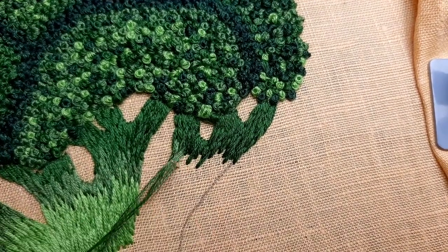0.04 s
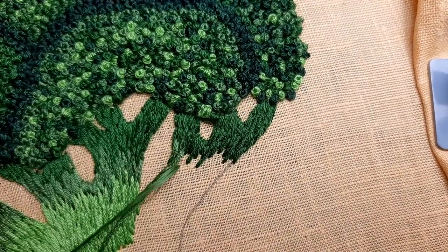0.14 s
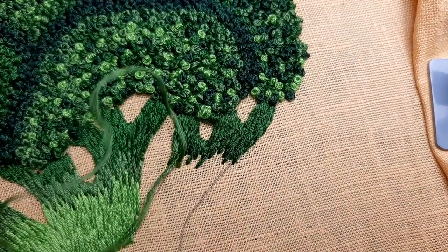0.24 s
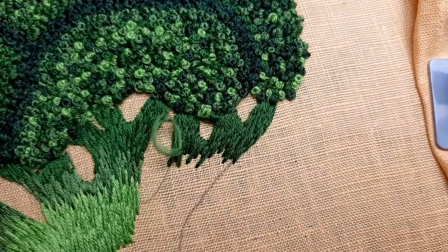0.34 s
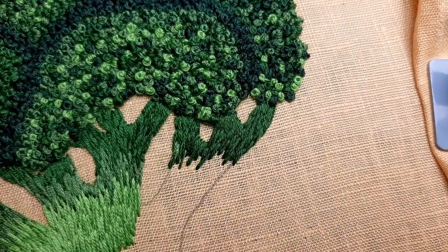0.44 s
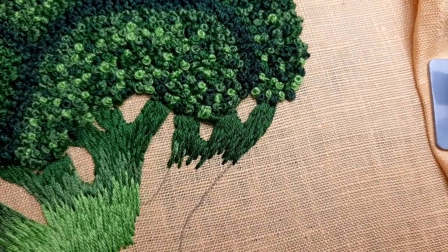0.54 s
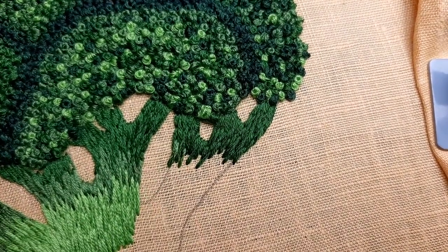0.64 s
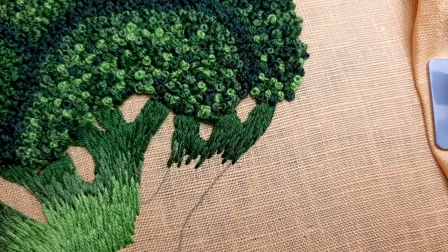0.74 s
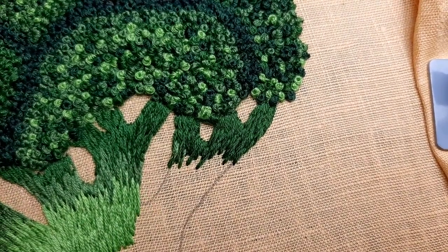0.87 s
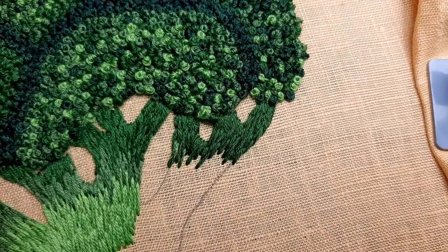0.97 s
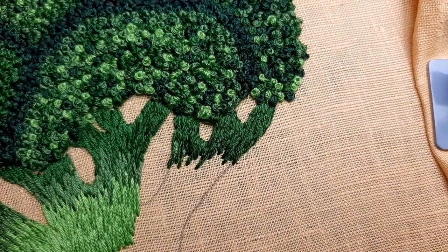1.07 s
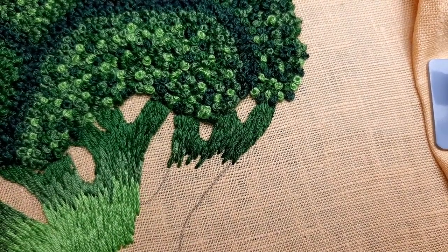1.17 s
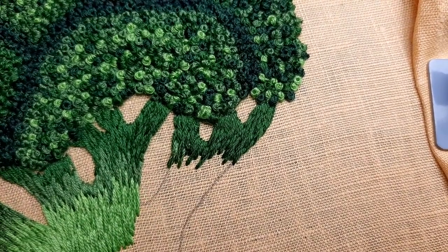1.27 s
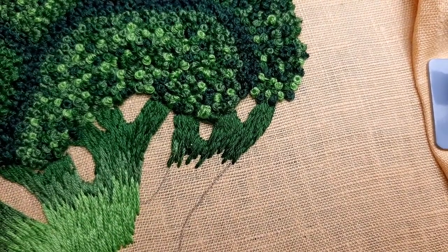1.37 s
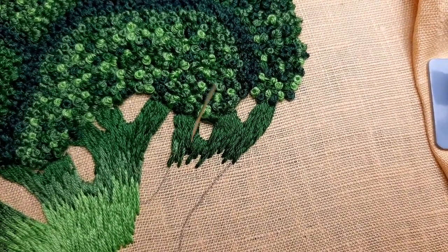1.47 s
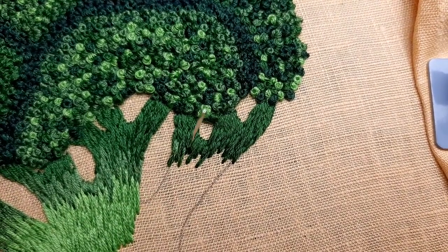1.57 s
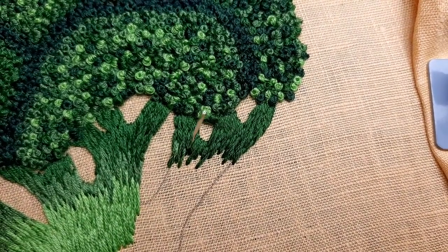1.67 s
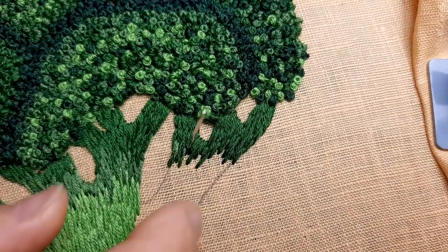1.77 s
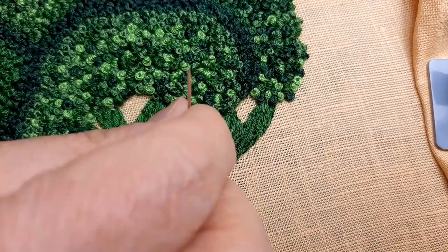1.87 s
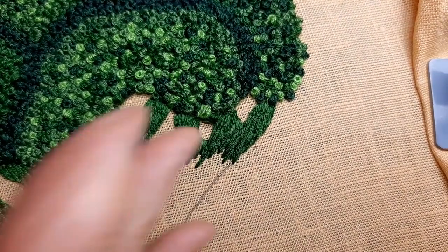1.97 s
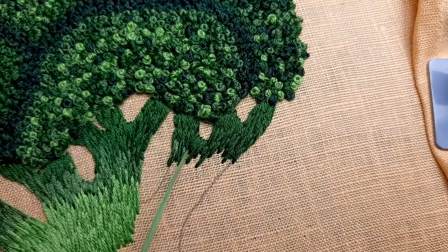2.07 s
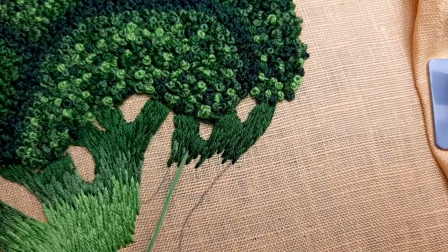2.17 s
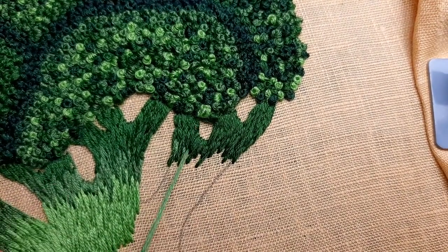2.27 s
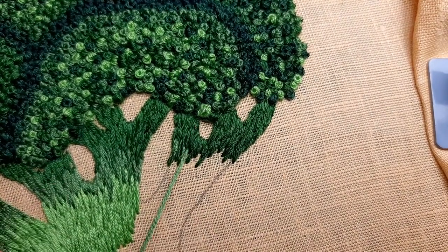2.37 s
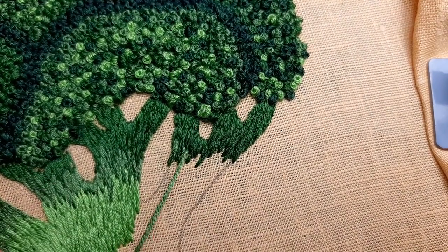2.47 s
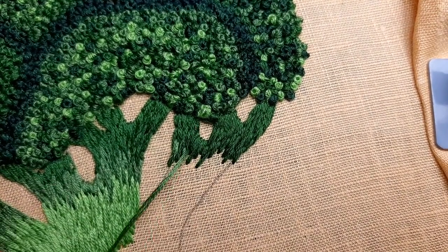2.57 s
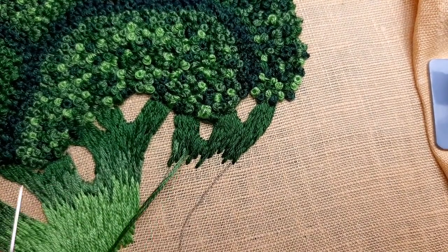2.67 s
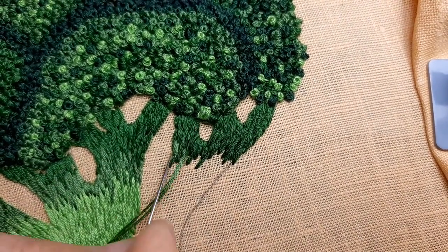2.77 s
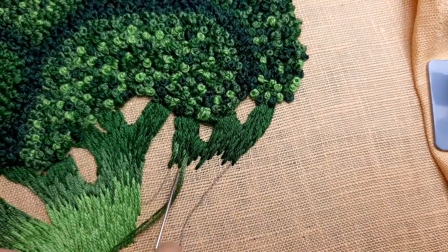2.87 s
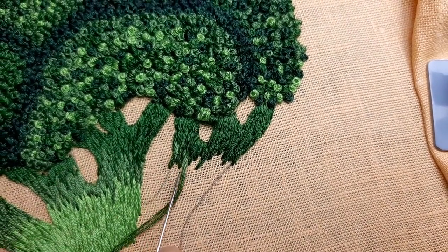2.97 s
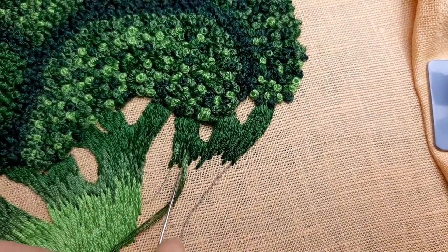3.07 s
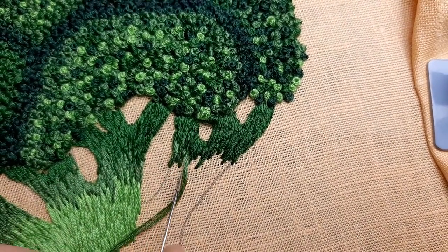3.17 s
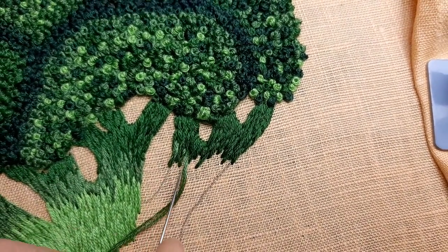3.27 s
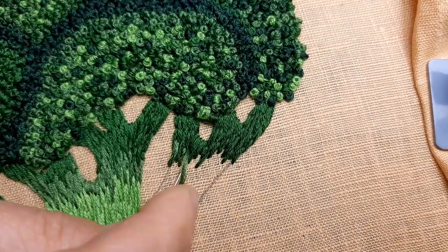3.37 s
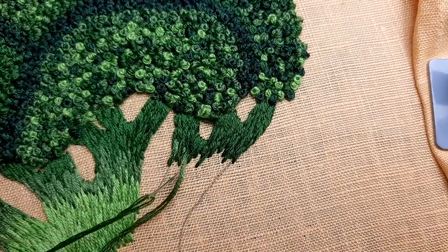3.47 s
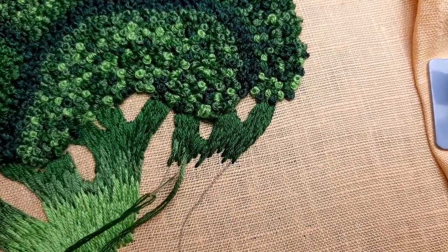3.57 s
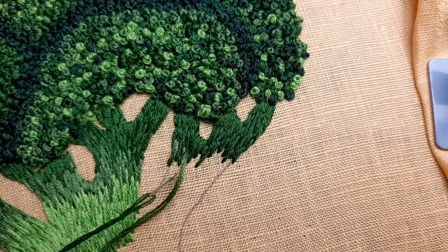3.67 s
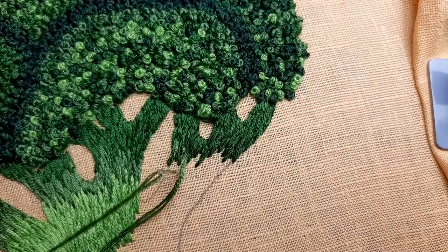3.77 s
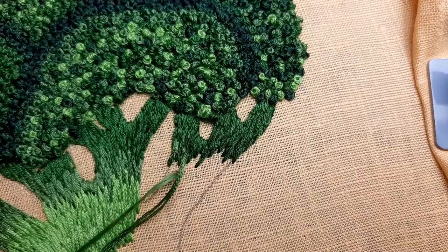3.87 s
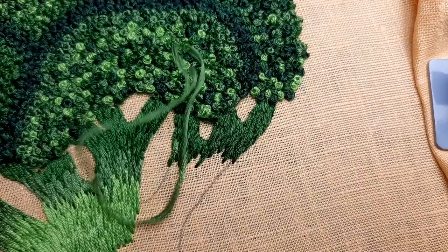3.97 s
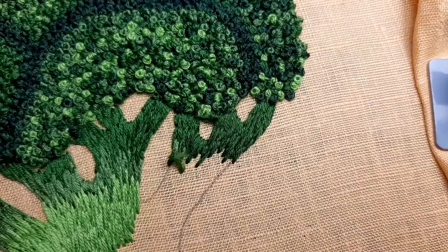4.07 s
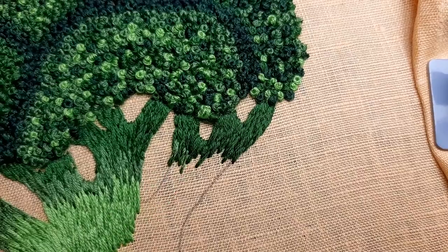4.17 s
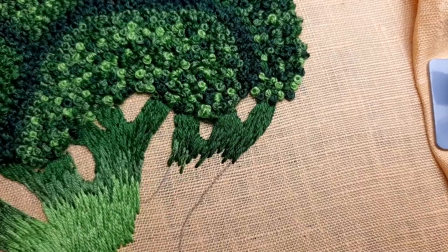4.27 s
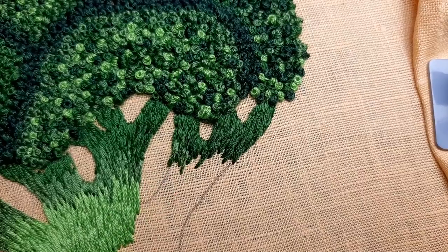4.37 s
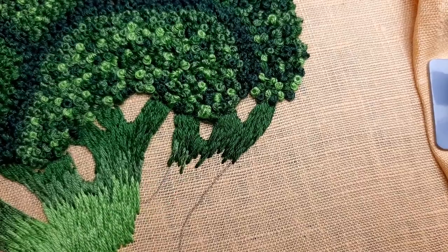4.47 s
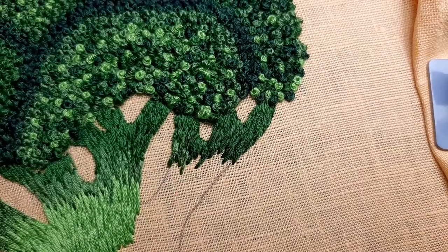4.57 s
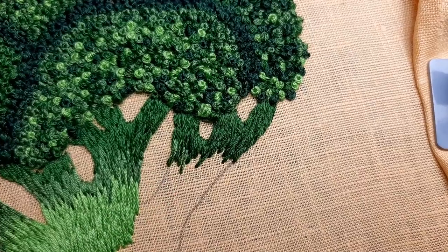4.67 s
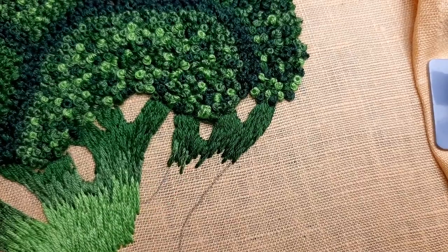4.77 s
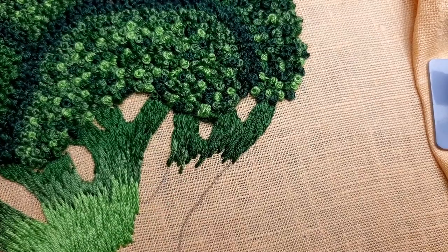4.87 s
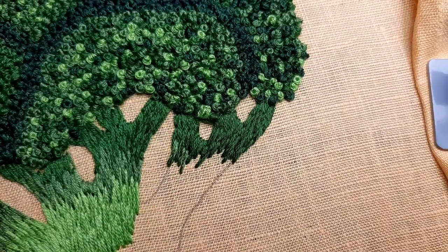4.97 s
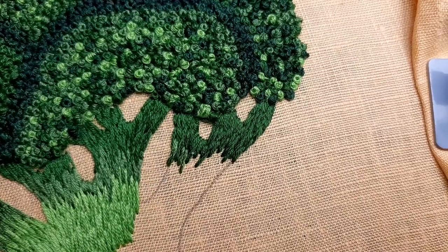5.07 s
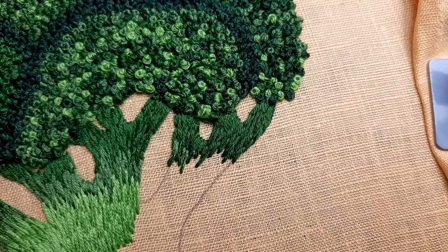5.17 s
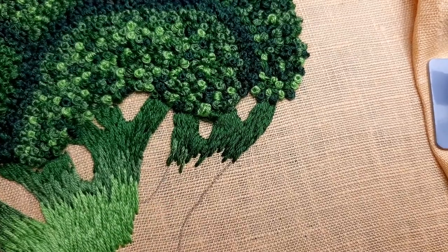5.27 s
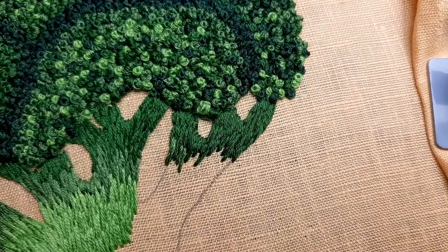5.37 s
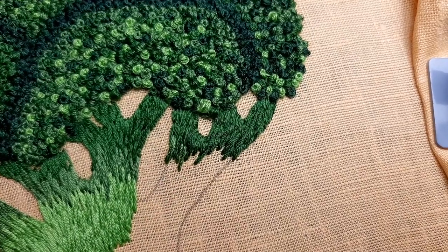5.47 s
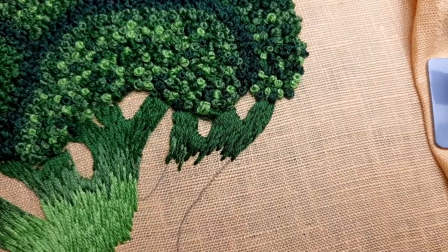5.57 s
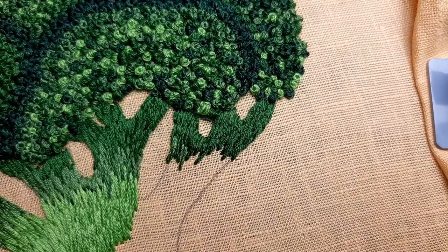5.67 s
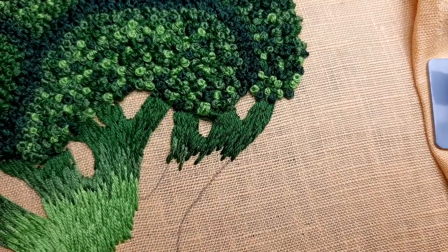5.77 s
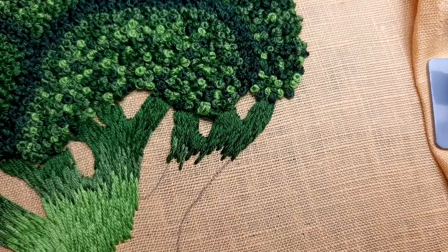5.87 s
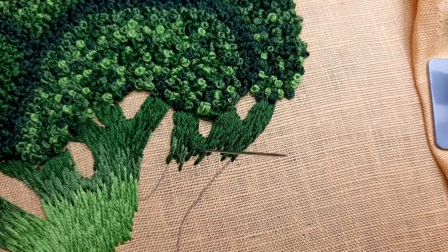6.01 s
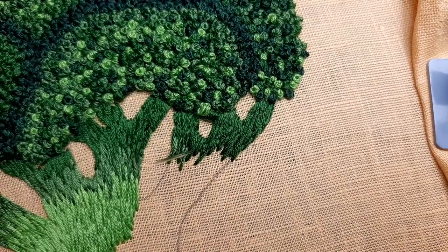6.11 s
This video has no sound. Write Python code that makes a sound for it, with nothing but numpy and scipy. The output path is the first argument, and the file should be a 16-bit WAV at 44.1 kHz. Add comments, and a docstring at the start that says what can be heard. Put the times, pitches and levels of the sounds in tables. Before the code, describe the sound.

Hollow little fabric thumps, each followed by a quick scratchy thread pull, in a quiet room with a small engine revving faintly beyond the wall.

```python
"""Embroidery on linen stretched drum-tight in a hoop, just right of a pair of microphones in a quiet room.
From the start the needle pops through the cloth, ringing its modes, and yarn rasps after it as dense slips
and fibre hiss; fingers brush and tap between three pulls, the second trailing on slowly. A faint hum passes early.
After two seconds a small engine, a sum of firing orders, slows beyond the wall, revs up and changes gear as two
more hums pass, then fades. Low street rumble, noise through wall resonances, and still air last throughout."""
import sys
import numpy as np
from scipy import signal
from scipy.fft import rfft, irfft, next_fast_len
from scipy.io import wavfile
from scipy.ndimage import uniform_filter1d

SR = 44100
rng = np.random.default_rng(int(sys.argv[2]) if len(sys.argv) > 2 else 0)


def store_pcm(level_fs):
    """Save levels as 16-bit WAV."""
    pcm = np.round(np.clip(level_fs, -1, 1) * 32767).astype(np.int16)
    wavfile.write(sys.argv[1], SR, np.atleast_2d(pcm).T)


def gain_from_db(level_db):
    """Convert decibel levels to linear amplitude factors (20 dB per decade)."""
    decades = np.asarray(level_db, float) / 20
    return 10 ** decades


N = 270758  # samples


def evened(x):
    """Normalization: scales a signal to rms 1."""
    return x / np.sqrt(np.mean(x ** 2) + 1e-20)


def read(points, hz):
    """Interpolation on a logarithmic frequency axis."""
    f, value = np.transpose(points)
    return np.interp(np.log(hz + 1), np.log(f + 1), value)


def stroke(start, length):
    """Event time base: sample range, seconds since the start and share done."""
    at = np.arange(round(start * SR), min(round((start + length) * SR), N))
    t = (at - at[0]) / SR
    return at, t, t / length


def swells(rows):
    """Amplitude envelope: flat-topped swells, each length lying between its 1/e points."""
    t = np.arange(0, N / SR, .002)
    gain = sum(gain_from_db(db) * np.exp(-(2 * (t - s) / length) ** 4) for s, db, length in rows)
    return np.interp(np.arange(N) / SR, t, gain)


def wander(size, seconds):
    """Low-pass noise: slow chance of rms 1."""
    wide = max(1, round(seconds * SR))
    smooth = uniform_filter1d(rng.standard_normal(size), wide)
    return evened(uniform_filter1d(smooth, wide))


def coloured(x, points):
    """Spectral shaping: filters by a spectrum in relative dB per Hz; rms 1."""
    size = next_fast_len(N)
    shape = gain_from_db(read(points, np.fft.rfftfreq(size, 1 / SR)))
    return evened(irfft(rfft(x, size) * shape, size)[:N])


def grit(per_s, spread_db):
    """Stick-slip as shot noise: random clicks of both signs, a few of them large; rms 1."""
    size = gain_from_db(spread_db * np.minimum(rng.exponential(1, N), 4)) * rng.standard_normal(N)
    return evened(size * (rng.random(N) < per_s / SR))


def pair(x, other, left_db, lag, same):
    """Interaural-style level, delay (samples) and coherence; rms-1 inputs give a summed power of 4."""
    same = np.clip(same, 0, 1)
    left = same * np.roll(x, round(lag)) + np.sqrt(1 - same ** 2) * other
    both = np.array([gain_from_db(left_db) * left, x])
    return 2 * both / (1 + gain_from_db(2 * left_db)) ** .5


# modes of the stretched cloth and hoop:
# (frequency [Hz], relative level [dB], t60 at damping 1 [s], left minus right [dB])
CLOTH_MODES = [(88.9, -11, 0.29, -21.5), (170, -3.5, 0.28, -25), (220.4, 9, 0.088, -28.5),
               (269.7, 10.5, 0.051, -6.5), (324, -1.5, 0.13, -6.5), (434.5, -4.5, 0.12, -3.5),
               (420, -22.5, 0.02, -7), (676, -7, 0.056, -11.5), (771, -18.5, 0.022, 7),
               (900, -18.5, 0.055, -17), (1027, -21, 0.063, -2.5), (1142, -19.5, 0.013, -11),
               (1447, -15.5, 0.03, -2.5), (1543, -21, 0.03, -2.5), (2116, -9, 0.01, -3.5)]


def drum_modes(damping=1, phase=0.98):
    """Modal decay: each mode of the cloth rings out as an exponentially damped cosine."""
    hz, _, t60, _ = np.transpose(CLOTH_MODES)[:, :, None]
    t = np.arange(SR // 3) / SR
    return gain_from_db(-60 * damping * t / t60) * np.cos(2 * np.pi * hz * t + phase)


def drum_response(modes, tilt_db=0, bell_db=0):
    """Modal superposition at both microphones; tilt and bell weight modes by octaves from 1100 Hz."""
    hz, db, _, left_db = np.transpose(CLOTH_MODES)
    octaves = np.log2(hz / 1100)
    gain = gain_from_db(db + tilt_db * octaves - bell_db * octaves ** 2)
    left = (gain * gain_from_db(left_db)) @ modes
    left = np.pad(left, (5, 0))[:modes.shape[1]]  # 5 samples later than the right
    return np.array([left, gain @ modes]) / gain.sum()


# needle pops and finger taps: (time [s], relative blow level [dB], relative tick level [dB],
# contact [ms], brightness [dB per octave], higher near the rim)
POPS_AND_TAPS = [(0.1203, -15.5, -54, 0.97, 6.5), (0.1277, -9.5, -47, 0.38, -1),
                 (0.897, -34.5, -62.5, 3.3, -7.5), (0.969, -37.5, -61, 0.38, 3),
                 (1.036, -26.5, -69, 1.06, 10.5), (1.046, -30.5, -59, 0.55, 4),
                 (1.789, -34, -69.5, 1.23, -1.5), (1.925, -11, -57, 1.12, 10),
                 (1.9324, -6, -58, 0.61, -4.5), (2.8599, -20, -42, 0.13, 7), (3.017, -26.5, -67, 1.18, 0),
                 (3.264, -27.5, -64, 0.84, 4), (3.744, -21.5, -55.5, 1.55, -5),
                 (3.8542, -9.5, -48, 0.69, 6), (3.8582, -8.5, -40, 0.58, 2), (4.8076, -28, -58, 0.69, 4.5),
                 (4.894, -26.5, -58.5, 0.53, 4), (4.972, -33, -72, 0.8, -7),
                 (5.0409, -6.5, -27.5, 0.45, 1.2), (5.541, -21, -56, 1.06, 5.5),
                 (6.025, -31, -58, 1.5, -2.5)]
TICK_T60_S, SNAP_DB = 0.0023, 12  # one sharp snap
FRAY_T60_S, FRAY_DB = 0.12, -23.5  # then fibres crackle on


def blows():
    """Impulse excitation: a short smooth push rings the cloth; a tick of noise marks the steel needle."""
    out, modes = np.zeros((2, N + SR)), drum_modes()
    t = np.arange(SR // 10) / SR
    noise = rng.standard_normal((len(POPS_AND_TAPS), len(t)))
    noise[:, 0] = gain_from_db(SNAP_DB)
    dying = gain_from_db(-60 * t / TICK_T60_S) + gain_from_db(FRAY_DB - 60 * t / FRAY_T60_S)
    for (s, blow_db, tick_db, contact_ms, rim_db), puff in zip(POPS_AND_TAPS, noise):
        push = np.hanning(max(3, round(contact_ms * SR / 1000)) + 2)
        push = push[None] / push.sum()
        sound = gain_from_db(blow_db) * signal.fftconvolve(drum_response(modes, rim_db), push, axes=1)
        tick = gain_from_db(tick_db) * dying * signal.lfilter([1, .2], 1, puff)
        sound[:, :len(t)] += [gain_from_db(-9) * np.roll(tick, 6), tick]
        sound[0] *= gain_from_db(-3.5)  # the hole is on the right of the hoop
        at = round(s * SR)
        out[:, at:at + sound.shape[1]] += sound
    return out[:, :N]


# pulls of yarn: (start [s], length [s], relative rasp through the cloth [dB], relative fibre hiss [dB],
# share done at top speed [0 to 1], rasp lost by the end [dB])
YARN_PULLS = [(.13, 0.29, -51, -58, 0.35, 11.5), (1.935, 0.29, -48, -60.5, 0.48, 18),
              (3.862, 0.25, -49, -56, 0.29, 6)]
ONSET_S, STOP_S = 0.0063, 0.016
JERK_DB, JERK_S = 9, 0.038  # the yarn breaks loose with a jerk
RASP_START_DB = 2.5  # drop at the start
HISS_START_DB, HISS_END_DB = 6, 9  # hiss starts low and dies faster than the rasp
JUDDER_DB, JUDDER_S = 1.13, 0.01  # the hand does not pull evenly
TRAIL_START_S, TRAIL_LENGTH_S = 2.175, .2  # the second pull trails on slowly
TRAIL_RASP_DB, TRAIL_HISS_DB = -69, -74.5


def pulls():
    """Speed-dependent friction: gains of rasp and of hiss as the hand speeds up, then slows."""
    rasp, fibres = np.zeros((2, len(YARN_PULLS), N))
    judder = gain_from_db(JUDDER_DB * wander(N, JUDDER_S))
    for k, (start, length, rasp_db, hiss_db, top, end_db) in enumerate(YARN_PULLS):
        at, t, done = stroke(start, length)
        ends = np.clip(np.minimum(t / ONSET_S, (length - t) / STOP_S), 0, 1)
        early = np.maximum(1 - done / top, 0) ** 2
        late = np.maximum((done - top) / (1 - top), 0) ** 2
        jerk_db = JERK_DB * np.exp(-t / JERK_S)
        rasp[k, at] = ends * gain_from_db(rasp_db + jerk_db - RASP_START_DB * early - end_db * late)
        fibres[k, at] = ends * gain_from_db(hiss_db - HISS_START_DB * early - (end_db + HISS_END_DB) * late)
    at, t, _ = stroke(TRAIL_START_S, TRAIL_LENGTH_S)
    ends = np.clip(np.minimum(t, TRAIL_LENGTH_S - t) / STOP_S, 0, 1)
    rasp[1, at] += ends * gain_from_db(TRAIL_RASP_DB)
    fibres[1, at] += ends * gain_from_db(TRAIL_HISS_DB)
    return rasp.sum(0) * judder, fibres * judder


def shaken(force, ring):
    """Convolution: the cloth under a random force; the mean of both microphones has rms 1."""
    sound = signal.oaconvolve(force[None], ring, axes=1)[:, :N]
    return sound / sound.mean(0).std()


# short scrapes of a yarn end or needle tip on the weave:
# (time [s], relative level [dB], fall to 1/e [s])
WEAVE_SCRAPES = [(0.465, -56, 0.034), (1.678, -62, 0.022), (2.858, -46.5, 0.013), (3.385, -62.5, 0.026),
                 (5.039, -47, 0.02), (5.537, -72, 0.025)]
# hands shifting the hoop, heard as a soft rumble of the cloth:
# (middle [s], relative level [dB], length [s])
HOOP_HANDLING = [(.04, -49, 0.083), (.92, -64, 0.073), (1.07, -57.5, 0.059), (1.16, -60, 0.044),
                 (1.44, -66, 0.18), (1.825, -50.5, 0.07), (2.25, -53.5, .25), (2.45, -56, 0.073),
                 (3.4, -46.5, 0.058), (3.76, -50, 0.068), (4.65, -56, 0.05), (5.6, -59, 0.22),
                 (6.03, -62.5, 0.061)]


def rubbing(pulled):
    """Friction-driven vibration: yarn in the hole and hands on the hoop shake the cloth with small slips."""
    t = np.arange(N) / SR
    scrapes = sum(gain_from_db(db) * np.exp(-((t - s) / fall) ** 2) * (t > s) for s, db, fall in WEAVE_SCRAPES)
    touched = drum_modes(damping=2.8, phase=np.pi / 2)
    quick = drum_response(touched, tilt_db=4.5, bell_db=6.5)  # quick slips favour the modes around 1 kHz
    slow = drum_response(drum_modes(damping=0.62, phase=np.pi / 2), tilt_db=-5.0)
    soft_yarn = signal.butter(4, 1750, fs=SR, output="sos")  # soft yarn slips no faster
    slips = signal.sosfilt(soft_yarn, grit(4000, 1.96))
    rasp = shaken(slips, quick) * (pulled + scrapes)
    drag = shaken(grit(1200, 2.2), slow) * pulled * gain_from_db(-4.0)
    handling = shaken(grit(600, 2.4), slow) * swells(HOOP_HANDLING)
    return gain_from_db([[-2.5], [.6]]) * (rasp + drag) + handling


# fibre hiss, one spectrum for each pull: (frequency [Hz], relative density [dB per Hz])
FIBRE_SPECTRA = [
    [(1180, -16), (2000, 4.5), (3150, -5), (4560, 0), (5100, -10), (5810, -13.5), (8050, -5.5),
     (9080, -0.5), (10800, -8.5), (15600, -6.5)],
    [(1180, -11), (2000, -5), (2700, -2.5), (3470, -12), (4410, 1.5), (5060, -10), (6220, 1), (6890, -6.5),
     (8700, -4.5), (15600, -3.5)],
    [(1180, -38), (2000, 3), (2900, -1.5), (3840, -1.5), (4640, 0), (5560, -17.5), (7010, -3), (9720, -3.5),
     (15600, -9.5)],
]
# fingers brushing yarn and cloth, and at 1.985 s a brief snag of the yarn during the second pull: (middle [s],
# relative level [dB], length [s])
FINGER_BRUSHES = [(.05, -74.5, 0.23), (.49, -78, 0.031), (.62, -73, 0.27), (.825, -69, 0.05),
                  (1.46, -80, 0.11), (1.82, -75, 0.061), (1.985, -54.5, 0.015), (2.53, -83, 0.14),
                  (2.74, -63.5, 0.095), (3.385, -64, 0.082), (3.78, -75.5, 0.14), (4.235, -73.5, 0.04),
                  (4.37, -71, 0.062), (4.46, -80, .06), (4.545, -71.5, 0.078), (5.59, -72.5, 0.12),
                  (5.7, -79, 0.15), (6.0, -77.5, 0.17)]
# spectrum of the brushing: (frequency [Hz], relative density [dB per Hz])
BRUSH_SPECTRUM = [(2940, -26), (5000, -7), (8090, -9), (9150, 1), (10700, -6), (11400, -0.5), (15600, 2.5)]


def hiss(pulled):
    """Direct radiation: scraping fibres, heard straight through the air as shaped shot noise."""
    out = np.zeros((2, N))
    for gain, spectrum in zip(pulled, FIBRE_SPECTRA):
        fibres, other = coloured(grit(9000, 1.7), spectrum), coloured(grit(7100, 8.5), spectrum)
        out += pair(fibres, other, left_db=-16.5, lag=24, same=0.067) * gain
    skin, other = coloured(grit(9800, 3.4), BRUSH_SPECTRUM), coloured(grit(9000, 6.4), BRUSH_SPECTRUM)
    return out + pair(skin, other, left_db=-9.0, lag=12, same=0.62) * swells(FINGER_BRUSHES)


# decay of the room: (frequency [Hz], t60 [s])
ROOM_DECAY = [(300, 0.1), (1000, 0.11), (12000, 0.044)]


def room(x):
    """Reverberation: sparse taps of random sign, each band dying at its own speed."""
    taps = np.zeros((2, SR // 2))
    at = np.arange(120, SR // 2 - 20, 20) + rng.integers(0, 20, (2, (SR // 2 - 121) // 20))
    np.put_along_axis(taps, at, rng.choice([-1., 1.], at.shape), 1)
    hz, t, z = signal.stft(taps, SR, nperseg=256)
    dying = gain_from_db(-60 * t / read(ROOM_DECAY, hz)[:, None])
    tail = signal.istft(z * dying, SR, nperseg=256)[1]
    return signal.oaconvolve(x[None], tail / np.linalg.norm(tail[0]), axes=1)[:, :N]


def tone(hz, gain):
    """Phase accumulation: a slightly unsteady sine; gain is its approximate rms."""
    waver = 1 + 0.086 * evened(uniform_filter1d(rng.standard_normal(len(hz)), 900))
    return 2 ** .5 * gain * waver * np.sin(2 * np.pi * (np.cumsum(hz) / SR + rng.random()))


# the engine slows, revs up, changes gear: (time [s], firing rate [Hz], relative level [dB])
ENGINE_RUN = [(2.3, 76, -86), (2.41, 75.7, -50), (2.54, 83.3, -65.5), (2.58, 83.4, -64), (2.72, 83.03, -54),
              (2.82, 82.25, -45.5), (2.951, 80.5, -55), (3.12, 79, -60), (3.3, 77.5, -50.5),
              (3.37, 74.26, -51.5), (3.451, 74, -68.5), (3.58, 73.94, -52.5), (3.68, 73.88, -55.5),
              (3.8, 75.82, -46.5), (4.0, 78, -56.5), (4.18, 81.8, -49.5), (4.3, 82, -60.5),
              (4.5, 86, -66.5), (4.58, 89, -70), (4.7, 93.97, -51.5), (4.851, 100.7, -47.5),
              (4.92, 100.6, -47), (4.959, 102.5, -64.5), (5.1, 110.1, -52), (5.2, 111.2, -62.5),
              (5.28, 117.7, -75), (5.44, 104.3, -68), (5.505, 98.85, -49.5), (5.57, 100.9, -43.5),
              (5.649, 98.3, -42.5), (5.69, 95.16, -65), (5.801, 101.5, -74.5), (5.92, 103.6, -54.5),
              (5.98, 100.6, -68), (6.1, 95.3, -69.5)]
# orders 2 to 9 of the firing rate: (relative level [dB])
ORDER_LEVELS = [-1.5, 1, -1, -2, -8, -10.5, -9.5, -8]
# how the room passes the orders: (frequency [Hz], gain [dB])
ROOM_BOOM = [(140, -11.5), (160, -4), (180, -19), (222, -6), (260, -14), (285, 3.5), (300, 7.5), (318, -3),
             (335, 3.5), (385, -9.5), (405, -21.5), (640, -29.5), (690, -13.5), (740, -30.5)]
DRIFT_DB, DRIFT_S = 1.4, 0.087  # each order swells and sinks on its own


def engine():
    """Harmonic synthesis: low firing orders; one booms whenever it crosses a resonance of the room."""
    s, firing_hz, loud_db = np.transpose(ENGINE_RUN)
    at, t, _ = stroke(s[0], s[-1] - s[0])
    hz = np.interp(t + s[0], s, firing_hz)
    db = np.interp(t + s[0], s, loud_db)
    out = np.zeros(N)
    for k, order_db in enumerate(ORDER_LEVELS, 2):
        drift_db = DRIFT_DB * wander(len(at), DRIFT_S)
        out[at] += tone(k * hz, gain_from_db(db + order_db + read(ROOM_BOOM, k * hz) + drift_db))
    out[at] *= signal.windows.tukey(len(at), .02)
    return out


# passing hums from outside:
# (start [s], length [s], first frequency [Hz], last frequency [Hz], relative peak level [dB])
PASSING_HUMS = [(4.04, 0.281, 285, 305, -45), (.6, 1.0, 377.5, 377, -65.5), (5.44, 0.16, 240, 190, -56)]


def hums():
    """Frequency glide: single tones that swell and fade along an arch."""
    out = np.zeros(N)
    for start, length, first_hz, last_hz, db in PASSING_HUMS:
        at, _, done = stroke(start, length)
        arch = abs(np.sin(np.pi * done)) ** 0.87
        out[at] += tone(first_hz + (last_hz - first_hz) * done, gain_from_db(db) * arch)
    return out


# street rumble through the wall: (time [s], relative level [dB])
STREET_LEVEL = [(0, -71), (.45, -66), (.6, -69), (1.2, -69), (1.4, -56), (1.6, -73.5), (2.299, -54),
                (2.54, -59), (2.7, -57.5), (3.5, -57.5), (4.3, -56.5), (4.55, -64), (4.75, -52.5),
                (5.1, -55.5), (5.32, -71), (5.55, -52.5), (5.799, -65), (6.14, -71.5)]
# resonances of the wall: (frequency [Hz], width [Hz], relative level [dB])
WALL_RESONANCES = [(297.3, 39, 1.5), (310, 17, -5), (384, 68, -10), (527.5, 35, -16.5), (684, 29, -15.5),
                   (162.6, 17, -6), (110.6, 3.5, -10)]


def street_rumble():
    """Resonant transmission: noise that comes in through the resonances of the wall."""
    size = next_fast_len(N)
    f = np.fft.rfftfreq(size, 1 / SR)
    wall = sum(gain_from_db(db) / (1 + (2 * (f - hz) / width) ** 2) for hz, width, db in WALL_RESONANCES)
    rumble, other = (evened(irfft(rfft(rng.standard_normal(size)) * wall, size)[:N]) for _ in range(2))
    street = gain_from_db(np.interp(np.arange(N) / SR, *np.transpose(STREET_LEVEL)))
    return pair(rumble, other, left_db=-6.0, lag=3, same=0.94) * street


# spectrum of the still air: (frequency [Hz], relative density [dB per Hz])
AIR_SPECTRUM = [(18, -60), (30, -40), (90, -8.5), (220, -22.5), (301, 2.5), (391, -23), (434, -9),
                (677, -18.5), (1060, -29.5), (10300, -38.5), (11800, -43.5), (12700, -47), (15700, -70.5)]


def air():
    """Stationary noise: still room air and microphone hiss, nearly incoherent between the sides."""
    left, right = (coloured(rng.standard_normal(N), AIR_SPECTRUM) for _ in range(2))
    return pair(right, left, left_db=-1.5, lag=0, same=0.074) * gain_from_db(-67.5)


def scene():
    """Superposition: the handwork and its reverberation over the sounds from outside and the air."""
    rasp, fibres = pulls()
    work = blows() + rubbing(rasp) + hiss(fibres)
    small_hoop = signal.butter(6, 78, "high", fs=SR, output="sos")  # a small hoop radiates no deep bass
    work = signal.sosfilt(small_hoop, work)
    reverberation = gain_from_db([[-14], [-10.5]]) * room(work.mean(0))
    outdoors = street_rumble() + (engine() + hums()) * gain_from_db([[-1.5], [1.3]])
    return work + reverberation + outdoors + air()


def low_pass(x):
    """Removes everything above the highest recorded frequency."""
    return signal.sosfilt(signal.butter(12, 16840, fs=SR, output="sos"), x)


def record(dry):
    """Band limitation: the microphones lose the top edge."""
    top_edge = signal.firwin(255, 15940, fs=SR)  # low-pass, Hz
    band = signal.oaconvolve(dry, top_edge[None], "same")
    return low_pass(band)


dry = scene()
out = record(dry)
store_pcm(out)
```